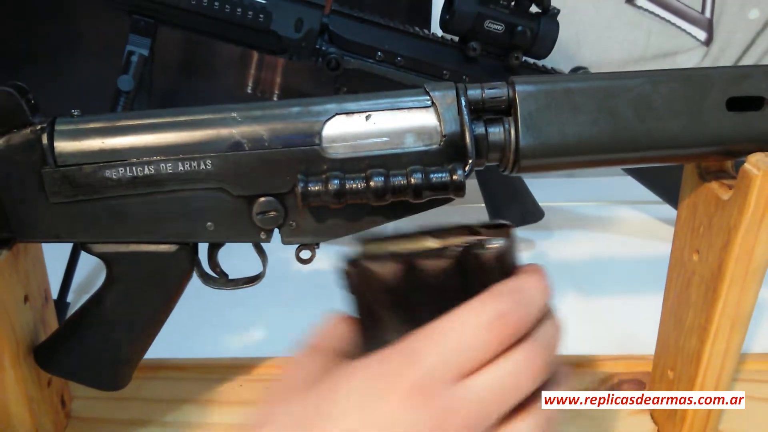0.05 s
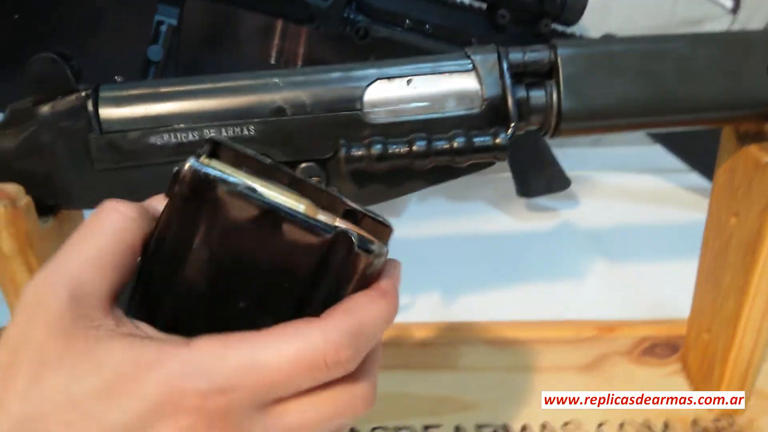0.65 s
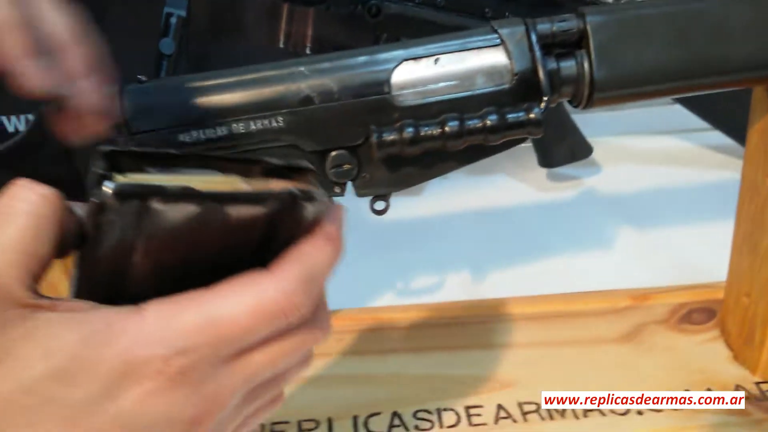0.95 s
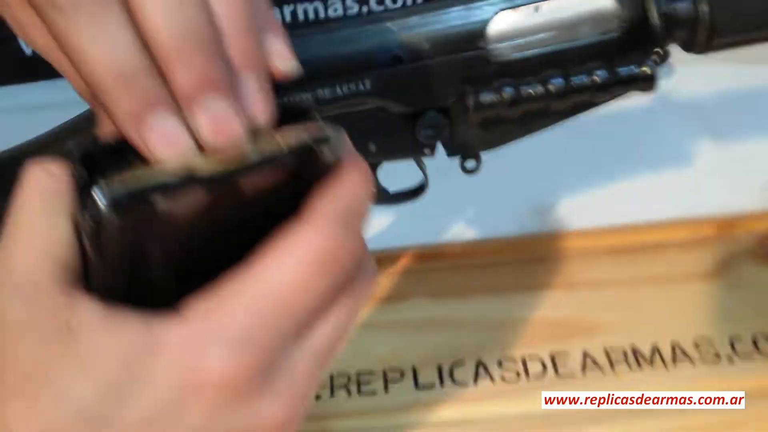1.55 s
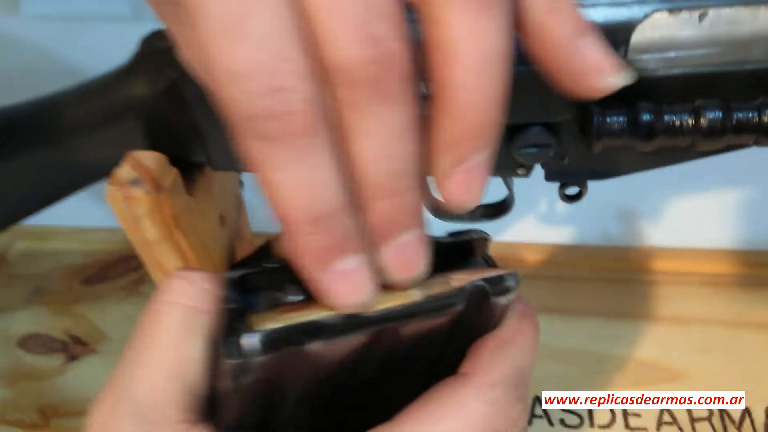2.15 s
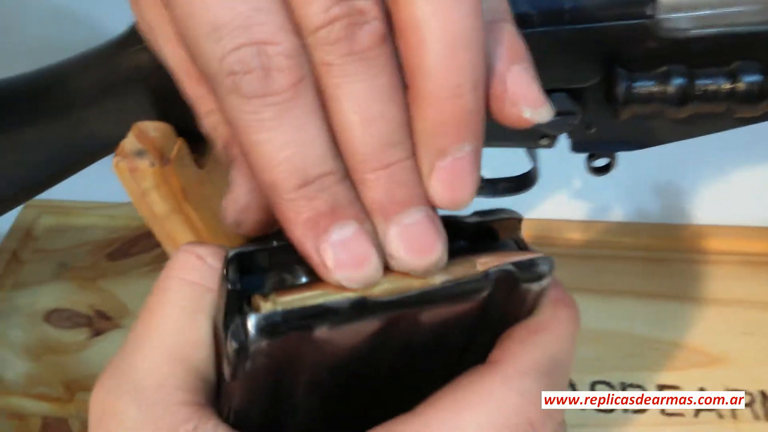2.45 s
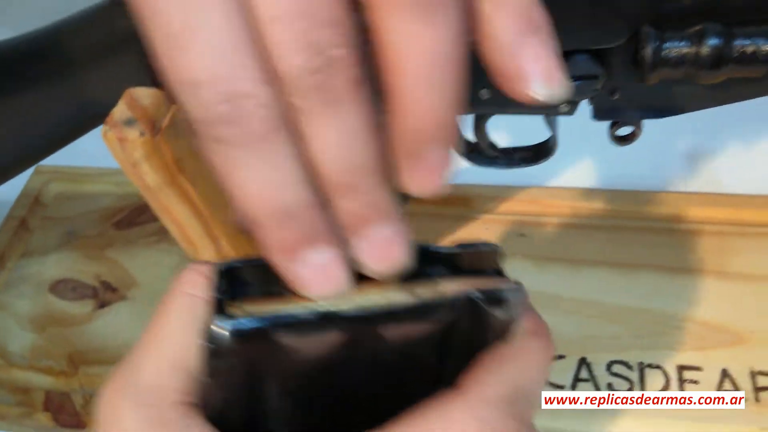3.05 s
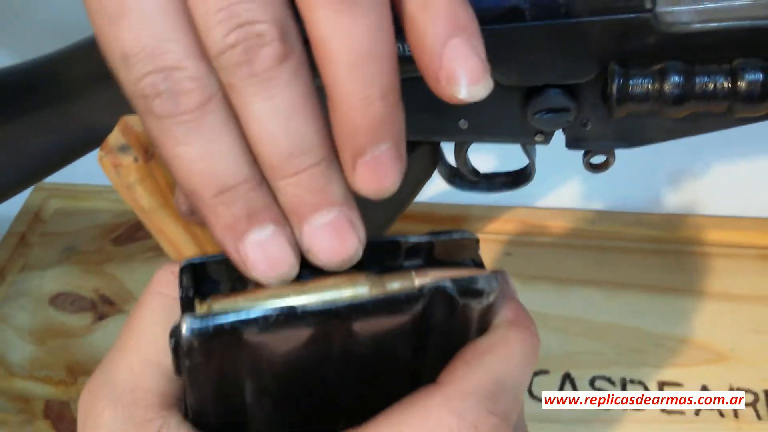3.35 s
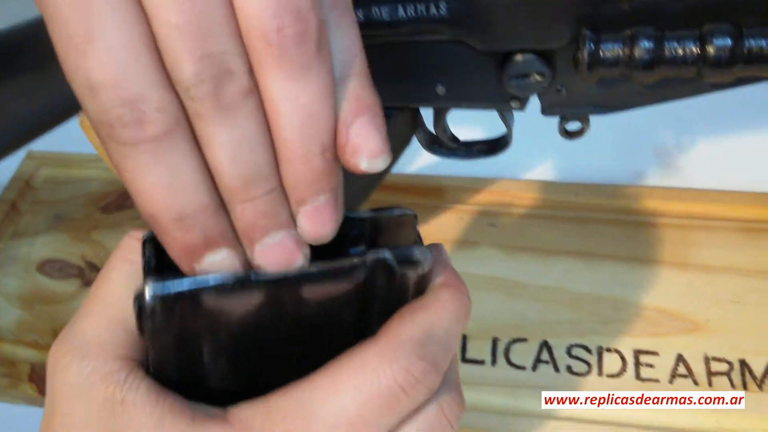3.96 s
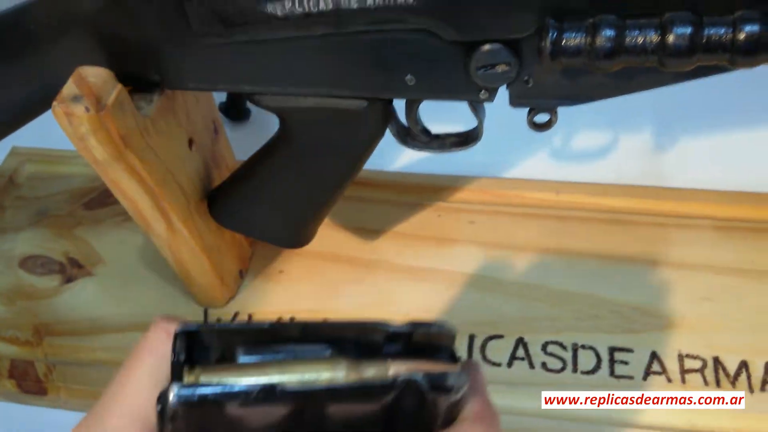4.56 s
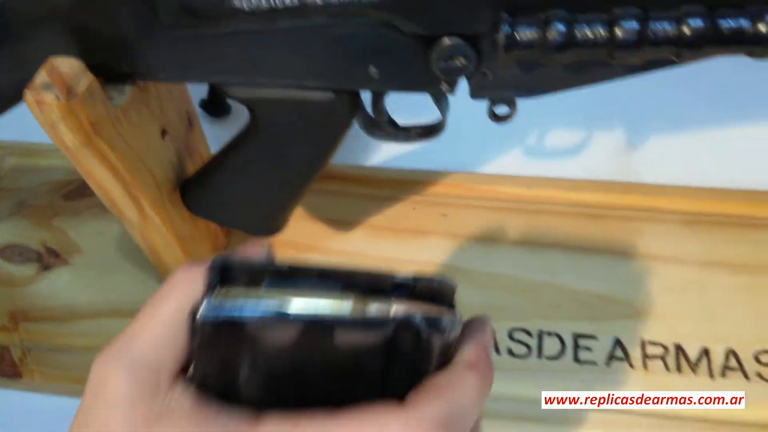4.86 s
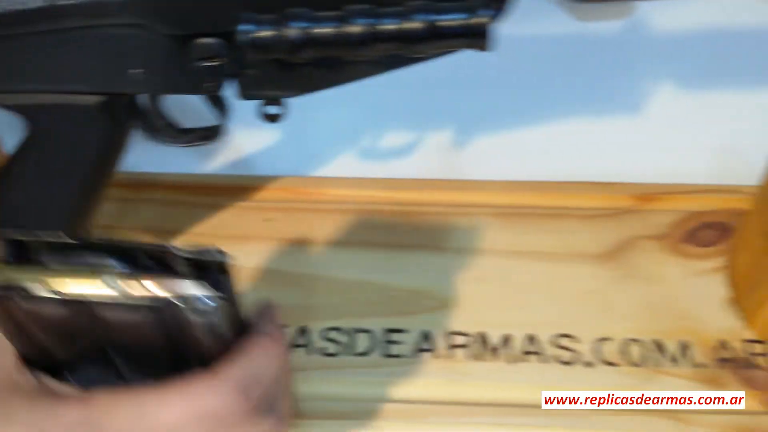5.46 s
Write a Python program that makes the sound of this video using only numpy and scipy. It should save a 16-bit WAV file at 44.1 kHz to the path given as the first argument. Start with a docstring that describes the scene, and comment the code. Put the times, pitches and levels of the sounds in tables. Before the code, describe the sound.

Three sharp metallic snaps, about a second apart, sound as a brass round is pressed into a steel rifle magazine and springs back. Gritty little scrapes and small clicks lead up to each one, after a few dull bumps of the hands at the start. The handling dies down to faint ticks. The microphone is close in a small room, with a low engine and traffic rumble through the walls and a slight electronic hiss.

```python
"""Small room, close microphone: a steel rifle magazine is handled.
Fingers press the top round down three times; it scrapes along the walls, then the spring snaps it
back against the lips and the case rings. Rounds and fingers tick on the case; the hands thud.
Outside, an engine and traffic rumble past. The electronics add a faint whine and hiss."""
import sys
import numpy as np
from scipy import signal
from scipy.fft import rfft, irfft
from scipy.io import wavfile
from scipy.ndimage import uniform_filter1d

SR = 44100
rng = np.random.default_rng(int(sys.argv[2]) if len(sys.argv) > 2 else 0)


def file_out(sig):
    """Save sig as 16-bit WAV at sys.argv[1]."""
    # one column per channel
    cols = np.atleast_2d(sig).T
    # limit, then scale
    lim = np.clip(cols, -1, 1)
    pcm = np.round(lim * 32767).astype(np.int16)
    wavfile.write(sys.argv[1], SR, pcm)


N = 252252
T = np.arange(N) / SR

# Round slides up, hits the lips, rebounds: hit t/s, slide length/s, slide end level/dB, hit level/dB,
# rebound delay/s, rebound level/dB, chatter level/dB, wall f/Hz, wall t60/s, hollow f/Hz
SNAPS = [(2.125, .125, -37.5, -14.5, .0078, -8.5, -35.5, 1634, .042, 622),
         (3.0605, .104, -34, -6, .0069, -8.5, -28, 1606, 0.078, 609),
         (4.4307, .064, -35.5, -11.5, .0062, -6, -20.5, 1603, .095, 558)]
# Light knocks on the case: t/s, level/dB, tilt/(dB/oct)
TICKS = [(0.0557, -55.5, -4), (.148, -62, -7), (1.3806, -36.5, -5.5), (1.4553, -38, -2.6),
         (1.472, -41.5, -6.5), (1.559, -48, -11), (1.5706, -43, -5.5), (1.817, -39.5, -6),
         (1.9535, -39, -4.5), (2.0, -48, 3), (2.54, -40.5, 6), (2.568, -35.5, -8), (2.594, -33.5, -2.5),
         (2.632, -33.5, -2.5), (2.774, -27.5, -1), (3.016, -32, 2.5), (3.362, -53, -1.5), (3.8479, -32, -2),
         (4.2115, -47.5, -0.5), (4.386, -41, -1), (5.449, -52.5, -1.5), (5.4906, -51, -1)]
# Loose round ringing after a knock: t/s, f/Hz, level/dB, t60/s
PINGS = [(1.381, 2910, -44, 0.046), (1.381, 3500, -41.5, 0.038), (2.134, 2750, -34, .16),
         (2.134, 3753, -25.5, .04), (3.061, 4760, -23.5, .04), (3.8484, 4040, -37, 0.047)]
# Round pushed along the wall: t/s, length/s, level/dB, tilt/(dB/oct)
STROKES = [(0.114, 0.043, -65, -2), (1.634, 0.054, -54, -1), (1.685, 0.098, -51, -2),
           (1.814, 0.093, -41, -1.3), (1.925, .05, -55, -6.5), (2.534, 0.045, -45.5, -1),
           (2.59, .18, -44.5, -0.75), (2.773, 0.051, -35.5, -0.1), (3.868, 0.12, -60.5, -1.5),
           (3.98, .04, -45, -0.6), (4.025, 0.047, -49.5, 0), (4.068, .082, -46, 0),
           (4.155, 0.15, -55.5, -1), (4.287, 0.015, -45, -0.5), (5.017, .05, -74, 4),
           (5.365, .065, -65, 5.5)]
# Hand bumps: t/s, level/dB
BUMPS = [(.570, -48.5), (.655, -45), (0.727, -49), (.85, -41), (1.445, -43)]
# Main case resonances: f/Hz, level/dB, t60/s
CASE_MODES = [(707, -14.5, .04), (874.6, -17.5, 0.067), (1373, -27.5, 0.063), (1750, -16, 0.1),
              (1845, -13.5, 0.067), (2205, -23, 0.073), (3074, -20.5, 0.055), (3844, -17.5, 0.12),
              (4300, -14, 0.047), (4795, -13, .05)]
# Spectra of struck steel, scraped steel, hand bumps: f/Hz, relative level/dB
STRUCK_SPECTRUM = [(270, -27), (400, -12.5), (610, 5.5), (1150, -4), (1650, 3), (2500, -3.5), (4000, 7),
                   (4800, 5.5), (5600, -4), (8400, 1), (9700, 9), (11000, 3.5), (13500, 4.5), (16000, -6)]
SCRAPED_SPECTRUM = [(440, 0), (690, 15), (1150, -7), (1450, 4), (1660, 11.5), (2200, -12), (2800, -9),
                    (3700, 2.5), (4700, 2), (5600, -8), (8600, -1.5), (9500, 7), (12500, 0.5),
                    (16000, -5.5)]
BUMP_SPECTRUM = [(45, -21), (75, 3), (150, -0.5), (300, -20.5), (900, -54)]
# Room decay: f/Hz, t60/s
ROOM_T60 = [(300, 0.58), (700, 0.3), (1600, 0.3), (4000, 0.29), (9000, 0.21), (16000, 0.12)]
# Echo colour: f/Hz, gain/dB
ROOM_COLOUR = [(200, -7), (580, 4.5), (900, 1.5), (1600, 1), (4000, -4), (6500, -4.5), (9500, 1.5),
               (13000, -5.5), (16000, -1.5)]
# Engine firing rate: t/s, f/Hz
FIRING_RATE = [(0, 48.15), (1.4, 50.3), (2.5, 53.16), (3.2, 55.2), (4.4, 57.47), (5.72, 56.1)]
# Swells of two beating engine tones: multiple of firing rate, peak t/s, half width/s, level/dB
ENGINE_TONES = [(1, 2.524, .88, -43), (1.085, 4.0, 1.4, -57), (1.085, 5.7, .45, -60.5)]
# Harmonics of each tone: order, level/dB
ENGINE_ORDERS = [(1, -0.5), (2, -11.5), (3, -31)]
# Traffic swells: peak t/s, half width/s, rumble level/dB, rush level/dB, tyre level/dB
TRAFFIC = [(.95, 0.32, -57, -67.5, -64.5), (2.299, 0.67, -53, -59, -73), (4.2, .4, -62.5, -70.5, -79.5),
           (5.6, 0.23, -53.5, -64, -79)]
# Spectra of traffic rumble, traffic rush, hiss: f/Hz, relative level/dB
RUMBLE_SPECTRUM = [(25, -26.5), (42, -19.5), (60, -5), (90, -3.5), (135, 3), (190, -6), (260, -2.5),
                   (330, -10), (450, -16.5), (900, -24), (2000, -53.5)]
RUSH_SPECTRUM = [(200, -3), (400, 5), (750, 1.5), (1100, 1), (1400, 0), (1900, 0.5), (2700, -12.5),
                 (4500, -22.5), (7000, -21.5)]
HISS_SPECTRUM = [(300, 6.5), (1500, -0.5), (4000, 2), (6500, -7), (8500, -5.5), (9300, 3), (9700, 13),
                 (10200, 1.5), (11500, 1.5), (16000, -1.5)]
# Hiss envelope: t/s, level/dB
HISS_LEVEL = [(0, -75.5), (1.0, -68), (2.2, -59.5), (3.5, -69), (5.2, -73), (5.72, -68)]
# Whine partials at mean hiss level: f/Hz, level/dB
WHINE = [(966, -66.5), (1932, -82), (9730, -96.5)]
# Microphone port imbalance before the bass taper: f/Hz, left minus right/dB
PORT_BALANCE = [(60, 0.5), (99, 0.5), (160, 0.5), (270, 0.0), (450, -1), (740, 0.0), (1220, 0.0),
                (2010, 0.0), (3330, 0), (5500, 2.5), (9080, -2.5), (15000, -1)]


def snaps(sing_db=-37, sing_t60_s=.28, split_hz=45, chatter_delay_s=.0195, chatter_t60_s=.15):
    """Spring throws the round against the lips: hit, rebound, stack chatter. Two walls sing and beat."""
    out = np.zeros(N)
    for s, _, _, hit_db, rebound_s, rebound_db, chatter_db, wall_hz, wall_t60_s, hollow_hz in SNAPS:
        sing = mode(wall_hz, sing_t60_s, size=22050)
        sing += from_db(-6) * mode(wall_hz + split_hz, sing_t60_s, size=22050)
        hit_ring = case_ring(wall_hz, wall_t60_s, hollow_hz)
        rebound_ring = case_ring(wall_hz, wall_t60_s / 2, hollow_hz, hollow_db=-15.5)
        chatter = crash(chatter_t60_s, tilt_db_oct=.43)
        chatter += from_db(-2.5) * case_ring(wall_hz + split_hz / 2, chatter_t60_s, hollow_hz)
        hit = from_db(hit_db) * crash(t60_s=.029, tilt_db_oct=4.9)
        rebound = from_db(rebound_db) * crash(t60_s=.03, tilt_db_oct=.3)
        add(out, s, hit + from_db(-10) * hit_ring)
        add(out, s, from_db(sing_db) * sing)
        add(out, s + rebound_s, rebound + from_db(-14.5) * rebound_ring)
        add(out, s + chatter_delay_s, from_db(chatter_db) * chatter)
    low_cut = signal.butter(2, 222, "high", fs=SR, output="sos")   # small case radiates no bass
    return signal.sosfilt(low_cut, out)


def crash(t60_s, tilt_db_oct, size=8192):
    """Dense steel modes, damped by the holding hand."""
    return noise(STRUCK_SPECTRUM, size, tilt_db_oct) * decay(t60_s, size)


def case_ring(wall_hz, wall_t60_s, hollow_hz, hollow_db=-11, scatter_db=0, detune=.015):
    """Wall and hollow modes follow the round's seat; the rest vary with grip and contact point."""
    out = mode(wall_hz, wall_t60_s) + from_db(hollow_db) * mode(hollow_hz, t60_s=.05)
    for hz, db, t60_s in CASE_MODES:
        out += from_db(db + scatter_db * rng.normal()) * mode(hz * (1 + detune * rng.normal()), t60_s)
    return out


def scrapes(slips_per_s=2400, slip_db=.5, slip_t60_s=.008, pressure_db=2.5, slide_rise_db=14):
    """Round moves in tiny slips: down under the fingers, back up before each snap."""
    slips = (rng.random(N) < slips_per_s / SR) * from_db(slip_db * np.minimum(rng.exponential(1, N), 4))
    energy_pole = from_db(-120 / (slip_t60_s * SR))
    energy = signal.lfilter([1], [1, -energy_pole], slips ** 2 + 1e-12)
    grain = unit_rms(np.sqrt(energy)) * from_db(pressure_db * drift(60))
    out = np.zeros(N)
    for s, length_s, db, tilt_db_oct in STROKES:
        squeak_hz = 3640 * 2 ** (.17 * np.clip(tilt_db_oct + 1, 0, 1))   # brighter squeaks higher
        add(out, s, from_db(db) * rub(length_s, tilt_db_oct, squeak_hz, squeak_db=-12.5))
    for hit_s, length_s, end_db, *_ in SNAPS:
        slide = rub(length_s, tilt_db_oct=.37, squeak_hz=4250, squeak_db=-11)
        speed = np.minimum(T[:len(slide)] / length_s, 1) ** 1.1
        add(out, hit_s - length_s, slide * from_db(end_db + slide_rise_db * (speed - 1)))
    return out * grain


def rub(length_s, tilt_db_oct, squeak_hz, squeak_db, wall_hz=1670, size=16384):
    """One stroke of brass on steel. Dull strokes drive the wall harder."""
    attack_s, release_s = .016, .017
    gate = np.interp(T[:size], [0, attack_s, length_s, length_s + release_s], [0, 1, 1, 0])
    wall = from_db(-10 - 2 * tilt_db_oct) * squeak(wall_hz, size)
    friction = noise(SCRAPED_SPECTRUM, size, tilt_db_oct)
    return gate * (friction + wall + from_db(squeak_db) * squeak(squeak_hz, size))


def squeak(hz, size, width_hz=70):
    """Narrow resonance driven by friction."""
    f = bins_hz(size)
    white = rfft(rng.standard_normal(size))
    return unit_rms(irfft(white / (1 + 1j * (f / hz - hz / f) * hz / width_hz), size))


def ticks(t60_s=.033):
    """Light contacts excite the case; loose rounds ping."""
    out = np.zeros(N)
    for s, db, tilt_db_oct in TICKS:
        wall_hz = 1600 * (1 + .02 * rng.normal())
        ring = case_ring(wall_hz, wall_t60_s=.06, hollow_hz=693.4, hollow_db=-10, scatter_db=2)
        ring_db = -9.5 - 1.5 * tilt_db_oct   # dull knocks ring more
        add(out, s, from_db(db) * (crash(t60_s, tilt_db_oct) + from_db(ring_db) * ring))
    for s, hz, db, ping_t60_s in PINGS:
        add(out, s, from_db(db) * mode(hz, ping_t60_s))
    return out


def bumps(t60_s=.13, size=8192):
    """Dull thuds as the grip changes."""
    out = np.zeros(N)
    for s, db in BUMPS:
        add(out, s, from_db(db) * noise(BUMP_SPECTRUM, size) * decay(t60_s, size, rise_s=.0031))
    return out


def room(x, wet_db=-7, first_echo_s=.0096, build_s=.008, size=22050):
    """Diffuse wall echoes; treble dies first."""
    white, hz, t = rfft(rng.standard_normal(size)), bins_hz(size), T[:size]
    centres_hz = [f for f, _ in ROOM_T60]
    tail = 0
    for share, (_, t60_s) in zip(np.eye(len(centres_hz)), ROOM_T60):
        band = irfft(white * at_hz(np.c_[centres_hz, share], hz), size)
        tail += band * from_db(-60 * t / t60_s)
    onset = np.clip((t - first_echo_s) / build_s, 0, 1)
    response = rfft(tail * onset)
    response /= np.sqrt(uniform_filter1d(np.abs(response) ** 2, size=35))   # no mode stands out
    tail = irfft(response * from_db(at_hz(ROOM_COLOUR, hz)), size) * (t > first_echo_s)
    return from_db(wet_db) * signal.fftconvolve(x, tail[:size * 3 // 4])[:N]


def engine(wander=.01, throb_db=2, falloff_db=12, drone_db=-58.5, drone_order=7):
    """Passing engine: two low tones swell in turn and beat; a high order carries only when closest."""
    firing_hz = curve(FIRING_RATE) * (1 + wander * drift(12))
    phase = 2 * np.pi * np.cumsum(firing_hz) / SR
    drone_gain = from_db(drone_db + throb_db * drift(33)) * swell(peak_s=2.45, width_s=.36)
    out = drone_gain * np.sin(drone_order * phase)
    for ratio, peak_s, width_s, peak_db in ENGINE_TONES:
        tone_db = peak_db - falloff_db * np.log2(1 + ((T - peak_s) / width_s) ** 2)
        for order, db in ENGINE_ORDERS:
            gain = from_db(tone_db + db + throb_db * drift(16))
            out += gain * np.sin(order * (ratio * phase + 2 * np.pi * rng.random()))
    return np.sqrt(2) * out


def traffic(far_rumble_db=-65.5, far_rush_db=-73, tyre_hz=1060):
    """Rumble, rush and tyre noise swell behind the walls, over a steady far bed."""
    rumble_gain, rush_gain, tyre_gain = from_db(far_rumble_db), from_db(far_rush_db), 0
    for peak_s, width_s, rumble_db, rush_db, tyre_db in TRAFFIC:
        near = swell(peak_s, width_s)
        rumble_gain = np.hypot(rumble_gain, from_db(rumble_db) * near)
        rush_gain = np.hypot(rush_gain, from_db(rush_db) * near)
        tyre_gain = np.hypot(tyre_gain, from_db(tyre_db) * near)
    roar = rumble_gain * noise(RUMBLE_SPECTRUM, N) + rush_gain * noise(RUSH_SPECTRUM, N)
    return roar + tyre_gain * squeak(tyre_hz, N, width_hz=130)


def electronics(waver=.0013):
    """Thin whine and hiss, swelling and sinking together."""
    hiss_db = curve(HISS_LEVEL)
    clock_s = np.cumsum(1 + waver * drift(15)) / SR
    whine = sum(from_db(db) * np.sqrt(2) * np.sin(2 * np.pi * hz * clock_s) for hz, db in WHINE)
    return from_db(hiss_db - hiss_db.mean()) * whine + from_db(hiss_db) * noise(HISS_SPECTRUM, N)


def mode(hz, t60_s, size=8192):
    """One struck resonance, random phase."""
    return np.sin(2 * np.pi * (hz * T[:size] + rng.random())) * decay(t60_s, size)


def decay(t60_s, size, rise_s=.00036):
    """Fast rise, exponential fall."""
    return from_db(-60 * T[:size] / t60_s) * (1 - np.exp(-T[:size] / rise_s))


def swell(peak_s, width_s):
    """Bell-shaped gain."""
    return np.exp(-.5 * ((T - peak_s) / width_s) ** 2)


def noise(spectrum, size, tilt_db_oct=0):
    """Coloured unit-rms noise, rolled off below the first point."""
    hz = bins_hz(size)
    low_cut = np.minimum(hz / spectrum[0][0], 1) ** 2
    gain = from_db(at_hz(spectrum, hz) + tilt_db_oct * np.log2(hz)) * low_cut
    return unit_rms(irfft(gain * np.exp(2j * np.pi * rng.random(len(hz))), size))


def drift(rate_hz):
    """Slow random curve, spread about 1."""
    return np.interp(T * rate_hz, np.arange(N // 8), rng.standard_normal(N // 8))


def curve(points):
    """Time curve at every sample."""
    return np.interp(T, *np.transpose(points))


def at_hz(points, hz):
    """Interpolate over log frequency."""
    f, value = np.transpose(points)
    return np.interp(np.log(hz), np.log(f), value)


def bins_hz(size):
    """FFT frequencies, floored at 1 Hz."""
    return np.maximum(np.fft.rfftfreq(size, 1 / SR), 1)


def from_db(db):
    """Decibels to gain."""
    return 10 ** (np.asarray(db) / 20)


def unit_rms(x):
    """Scale to rms 1."""
    return x / np.sqrt(np.mean(x ** 2) + 1e-20)


def add(out, start_s, sound):
    """Mix in at start_s."""
    i = round(start_s * SR)
    out[i:i + len(sound)] += sound[:N - i]


def scene(soft_echo_db=-3, taper_hz=1500):
    """All sources at two close microphone ports that differ in treble colour."""
    loud, soft = snaps(), ticks() + scrapes()
    echoes = room(loud + from_db(soft_echo_db) * soft)   # ticks and scrapes sound drier than snaps
    mix = rfft(loud + soft + echoes + bumps() + engine() + traffic() + electronics())
    hz = bins_hz(N)
    bass_taper = np.minimum(hz / taper_hz, 1) ** 2
    lean = from_db(bass_taper * at_hz(PORT_BALANCE, hz) / 2)
    return np.array([irfft(mix * lean, N), irfft(mix / lean, N)])


def record(dry):
    """Soft clip, then steep low-pass."""
    ceiling, cutoff_hz = .68, 16000
    rounded = dry / (1 + (dry / ceiling) ** 4) ** (1 / 4)
    low_pass = signal.ellip(12, .1, 80, cutoff_hz, fs=SR, output="sos")
    return signal.sosfilt(low_pass, rounded)


dry = scene()
out = record(dry)
file_out(out)
```